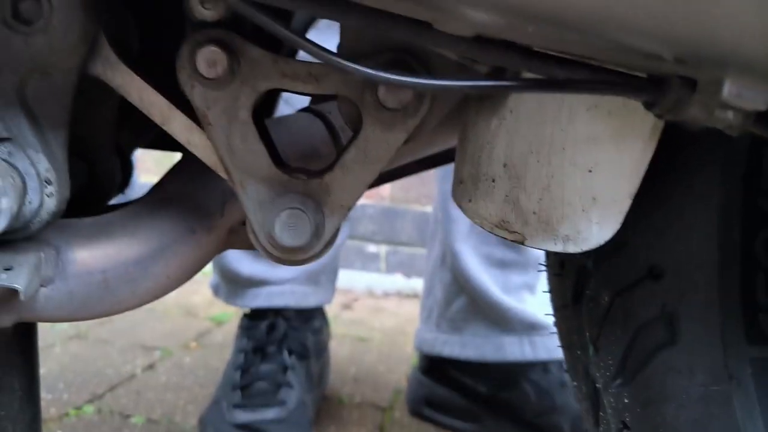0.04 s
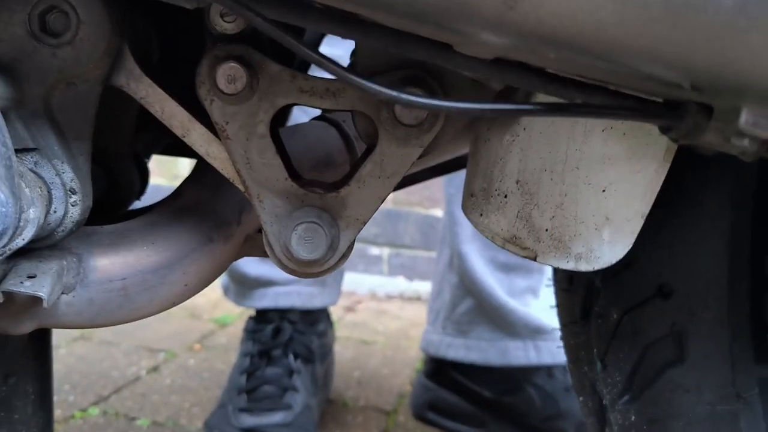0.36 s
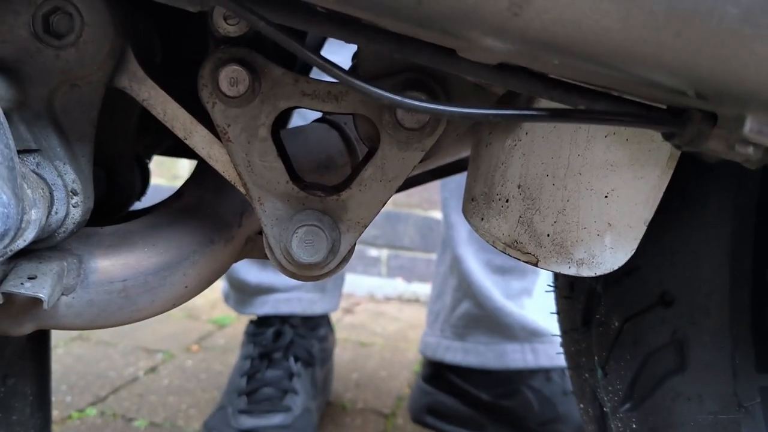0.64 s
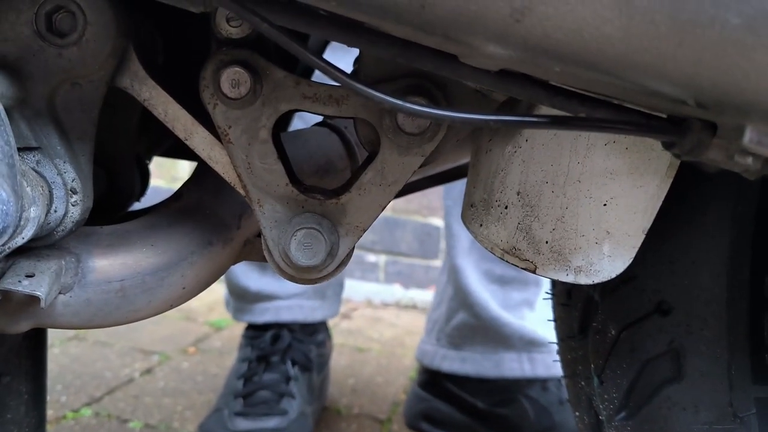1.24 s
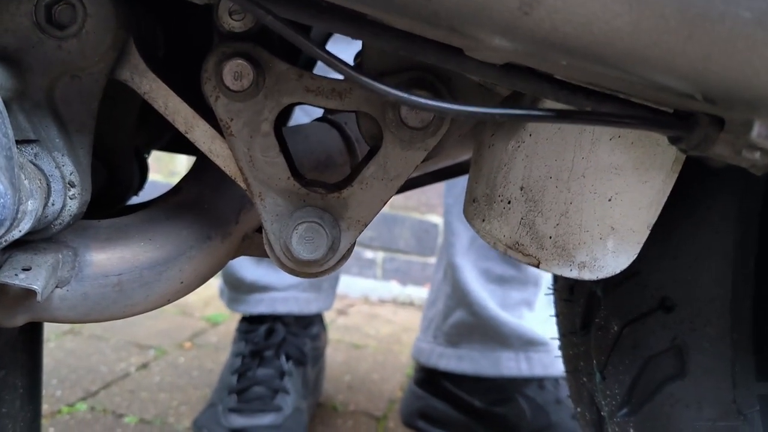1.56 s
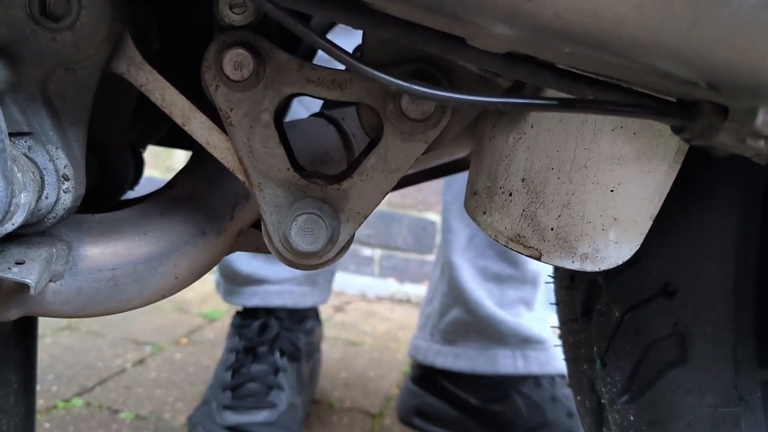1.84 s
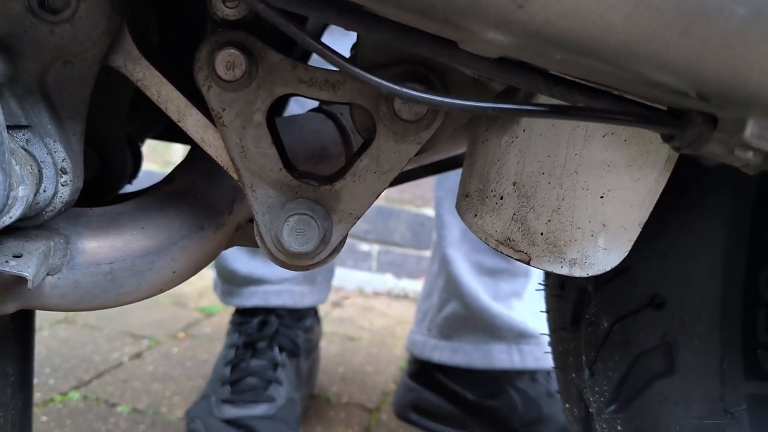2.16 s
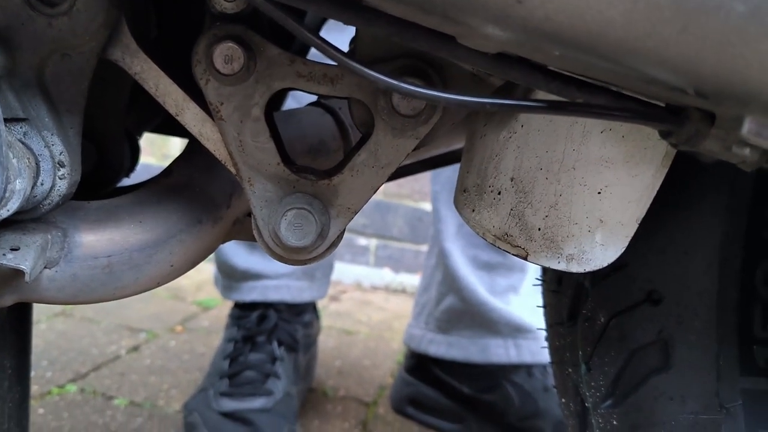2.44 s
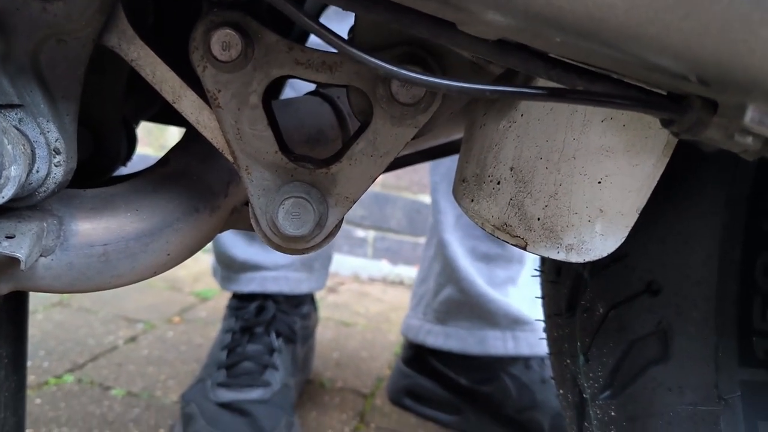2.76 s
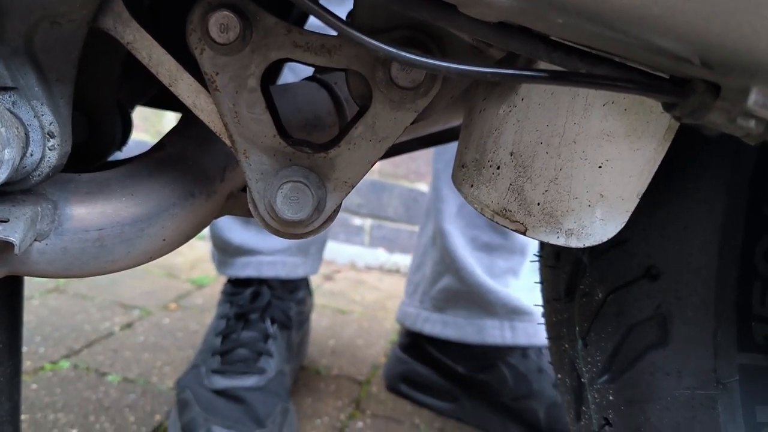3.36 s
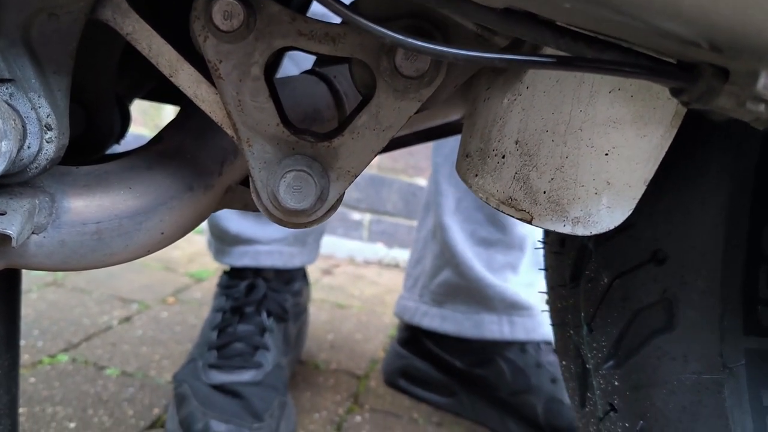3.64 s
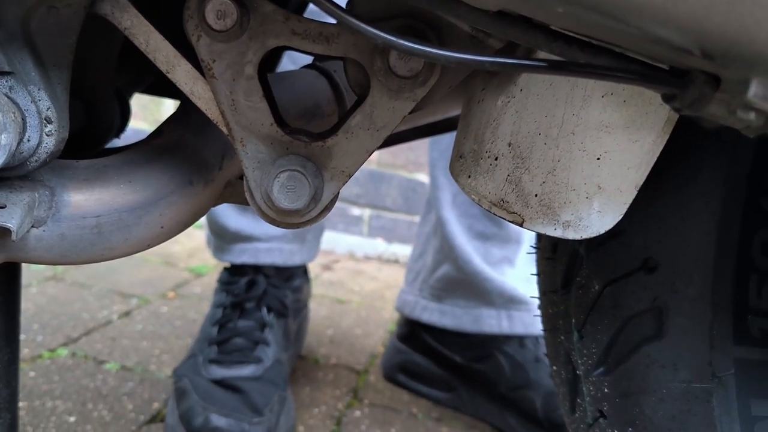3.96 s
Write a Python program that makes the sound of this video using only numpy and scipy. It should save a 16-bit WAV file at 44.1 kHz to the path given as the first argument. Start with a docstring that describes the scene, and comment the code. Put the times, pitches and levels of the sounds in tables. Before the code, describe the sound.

A motorcycle's rear suspension clunks three times up close, each with a rattle and low shudder.

```python
"""Three metallic clunks, each with a rattle and a low shudder, sound close to the rear suspension of a
parked motorcycle rocked by hand on paving. Slack in the linkage closes, and the impact excites the modes
of the steel; lighter contacts rattle round it while the frame trembles. Hollow taps and fine ticks fall
in between, and a far bird whistles over a low outdoor rumble and a soft hiss."""
import sys
import numpy as np
from scipy import signal
from scipy.fft import rfft, irfft
from scipy.io import wavfile
from scipy.ndimage import uniform_filter1d

SR = 44100
rng = np.random.default_rng(int(sys.argv[2]) if len(sys.argv) > 2 else 0)


def dump(signal):
    """Clip the signal to [-1, 1] and save it as 16-bit WAV at the path in sys.argv[1]."""
    limited = np.clip(np.atleast_2d(signal).T, -1, 1)
    pcm = np.round(limited * 32767).astype(np.int16)
    wavfile.write(sys.argv[1], SR, pcm)


N = 176400

# the slack closes: start_s, ring_gain_db, shudder_gain_db
CLUNKS = [(0.3932, 0, -5), (1.9888, -0.5, -4.5), (3.8524, -1, -5)]


def amp(db):
    """Amplitude ratio: a factor of ten for every 20 dB."""
    return 10 ** (np.asarray(db) / 20)


def along(table, hz, column=1):
    """Interpolation of one table column on a logarithmic frequency axis."""
    table = np.array(table, float)
    return np.interp(np.log(np.maximum(hz, 1)), np.log(table[:, 0]), table[:, column])


def add(out, start_s, sound):
    """Superposition: a sound adds to the mix from its start time."""
    i = max(int(start_s * SR), 0)
    out[:, i:i + sound.shape[1]] += sound[:, :max(N - i, 0)]


def noise(gain, size, bass_width=0.25, widening_hz=2220):
    """Filtered stereo noise of rms 1; coherence between the sides falls with frequency."""
    hz = np.fft.rfftfreq(size, 1 / SR)
    mid, side = rfft(rng.standard_normal((2, size)))
    width = np.clip(bass_width + hz / widening_hz, 0, 1)
    left_right = np.array([mid + width * side, mid - width * side])
    x = irfft(gain(hz) * left_right / np.hypot(1, width), size)
    return x / np.sqrt(np.mean(x ** 2))


def coloured(spectrum):
    """Stationary noise of rms 1 with a given spectral shape."""
    return noise(lambda hz: amp(along(spectrum, hz)), N)


def waver(rate_hz):
    """Random modulation: straight ramps between Gaussian values of spread 1."""
    step = max(int(SR / rate_hz), 1)
    return uniform_filter1d(np.repeat(rng.standard_normal(N // step + 1), step), step)[:N]


def swell(t, rise_s, t60_s):
    """Envelope of a damped resonance: build-up, then exponential decay; peak 1."""
    env = (1 - np.exp(-(t / rise_s) ** 2)) * np.exp(-np.log(1000) * t / t60_s)
    return env / env.max()


def burst(bands, rise_s):
    """Modal overlap: dense struck resonances merge into noise, each third octave with its own decay."""
    t, out = np.arange(SR // 2) / SR, 0
    for hz in 1000 * 2 ** (np.arange(-10, 13) / 3):
        if hz > bands[0][0] / np.sqrt(2):
            env = swell(t, rise_s + .5 / hz, along(bands, hz, column=2))
            band = env * noise(lambda f: np.exp(-(6 * (f / hz - 1)) ** 2), len(t))
            out = out + band * amp(along(bands, hz)) * np.sqrt(np.mean(env ** 2) / np.mean(band ** 2))
    return out


def background():
    """Random modulation makes a low outdoor rumble, two faint tones and a fading hiss waver."""
    # spectra of rumble and hiss: frequency_hz, relative_density_db
    rumble_spectrum = [(25, -33), (50, -17), (65, -11), (114, -5), (175, -8), (212, -3), (256, -8),
                       (344, -6.5), (416, -10), (520, -16.5), (610, -18.5), (700, -15.5), (1440, -23.5),
                       (2220, -24), (3820, -37.5), (6000, -41.5), (8360, -37), (9070, -40.5), (16000, -39)]
    hiss_spectrum = [(2000, 2), (3100, -6), (3900, -3.5), (4600, -7.5), (6200, -1.5), (8000, -0.5),
                     (10000, -11.5), (16000, -11.5)]
    # low tones: pitch_hz, level_db
    tones = [(123.8, -61), (209.9, -60)]
    # contour of the hiss: time_s, level_db
    hiss_contour = [(0, -55.5), (.18, -57.5), (.3, -64.5), (.6, -59), (.85, -57), (1.15, -72), (1.75, -66),
                    (2.4, -72.5), (4, -69)]
    out = amp(-52.5 + .6 * waver(5.84)) * coloured(rumble_spectrum)
    for hz, db in tones:
        env = amp(db + 3.5 * waver(5.15))
        pitch_hz = hz * (1 + .03 * waver(25))
        out += env * np.sin(2 * np.pi * np.cumsum(pitch_hz) / SR)
    hiss_db = np.interp(np.arange(N) / SR, *np.array(hiss_contour).T) + 1.3 * waver(50)
    return out + amp(hiss_db) * coloured(hiss_spectrum)


def tick(hz, relative_bandwidth=0.21):
    """A tiny click: quickly decaying noise shaped by one broad resonance."""
    t = np.arange(SR // 10) / SR
    grain = noise(lambda f: 1 / np.hypot(1, ((f + 1) / hz - hz / (f + 1)) / relative_bandwidth), len(t))
    return amp(-52.5) * swell(t, rise_s=0.00034, t60_s=0.024) * grain


def ticks():
    """Short transients, heard as fine bright ticks while the bike is moved."""
    # fine ticks: start_s, resonance_hz, gain_db
    clicks = [(0.038, 6150, 8), (.158, 9000, -1), (.301, 9000, -0.5), (1.389, 8600, -2), (1.437, 4100, -7),
              (1.488, 8800, -2), (1.659, 8400, 4), (1.8923, 8700, -2), (1.9465, 6100, -0.5),
              (2.382, 7000, -2.5), (2.51, 7000, 0.5), (2.7763, 6030, -4), (3.175, 9400, 0),
              (3.25, 9800, -2.5), (3.377, 6900, 1)]
    out = np.zeros((2, N))
    for start_s, hz, db in clicks:
        add(out, start_s, amp(db) * tick(hz))
    return out


def grit(count=36):
    """A random point process: faint ticks scattered evenly in probability over time."""
    out = np.zeros((2, N))
    for when, colour, faintness in rng.random((count, 3)):
        gain_db = -11 - 2.2 * np.log(faintness + 0.041)
        add(out, when * N / SR, amp(gain_db) * tick(5500 + 4500 * colour))
    return out


def taps():
    """As the bike leans, one strongly damped mode gives each dull tap its hollow pitch."""
    # dull taps: start_s, pitch_hz, gain_db
    contacts = [(.084, 724, -1.5), (.733, 640, -5), (1.599, 1290, -4.5), (1.660, 726, 1),
                (1.783, 720, -3.5), (1.811, 678, 3), (3.466, 703, -1), (3.631, 735, -3.5)]
    # dense resonances of a tap: frequency_hz, third_octave_peak_db, t60_s
    tap_bands = [(500, -56, 0.16), (864, -62.5, 0.15), (1370, -62.5, 0.15), (2000, -57.5, 0.028),
                 (3280, -65.5, 0.013), (5000, -78, 0.043), (9000, -78, 0.034)]
    out, t = np.zeros((2, N)), np.arange(SR // 2) / SR
    env = amp(-43.5) * swell(t, rise_s=0.0013, t60_s=0.036)
    for start_s, hz, db in contacts:
        hollow = env * np.sin(2 * np.pi * hz * t)
        add(out, start_s, amp(db) * (hollow + burst(tap_bands, rise_s=0.00075)))
    return out


def bird(echo_db=-3):
    """Reverberation: reflections from walls blur the falling whistles of a far bird."""
    # whistles: start_s, length_s, start_hz, end_hz, level_db
    whistles = [(.32, .06, 2970, 2930, -65), (.605, .075, 2140, 2080, -61), (.72, .4, 2880, 2100, -66.5),
                (1.21, .33, 3000, 2170, -69.5), (1.61, .19, 2980, 2350, -70)]
    out, t = np.zeros((2, N)), np.arange(SR // 2) / SR
    for start_s, length_s, start_hz, end_hz, db in whistles:
        size = int(length_s * SR)
        progress = np.linspace(0, 1, size)
        glide_hz = start_hz + (end_hz - start_hz) * np.sin(np.pi * progress / 2) ** 2
        pitch_hz = glide_hz * (1 + .028 * waver(130)[:size])
        fade = np.clip(np.minimum(progress, 1 - progress) / .1, 0, 1)
        env = fade * amp(db + 3 * waver(45)[:size])
        add(out, start_s, np.tile(env * np.sin(2 * np.pi * np.cumsum(pitch_hz) / SR), (2, 1)))
    walls = rng.standard_normal((2, len(t))) * swell(t, rise_s=.005, t60_s=.3)
    echo = signal.fftconvolve(out, walls / np.linalg.norm(walls[0]), axes=1)[:, :N]
    return out + amp(echo_db) * echo


def linkage_ring(out_of_step_hz=3040):
    """Impulse response of the steel: a crack, a faint after-ring and modes, the low ones blooming late."""
    # dense resonances: frequency_hz, third_octave_peak_db, t60_s
    crack = [(101, -46, 0.18), (250, -28.5, 0.025), (500, -28, 0.11), (915, -24, 0.048), (1420, -23, 0.015),
             (2010, -26, 0.077), (2700, -28.5, 0.11), (3400, -29, 0.051), (4400, -41, 0.091),
             (7360, -34.5, 0.047), (10400, -42, 0.082), (16000, -51, .035)]
    after_ring = [(197, -50, 0.31), (560, -43, 0.5), (1610, -39, 0.13), (3050, -62, 0.84),
                  (7300, -57.5, 0.7), (16000, -67, .45)]
    # modes of linkage and swingarm: pitch_hz, level_db, rise_s, t60_s, left_minus_right_db
    modes = [(115, -34.5, 0.0053, 0.23, 5), (421.5, -19.5, 0.02, 0.055, 1.5),
             (625.5, -19.5, 0.0065, 0.06, 5), (693, -25, 0.0025, 0.038, 19),
             (1110, -26.5, 0.0028, 0.042, -3), (1236, -18, 0.0013, 0.02, 10),
             (1431, -15.5, 0.0015, 0.062, -1.5), (1530, -22.5, 0.0035, .055, 9),
             (1683, -19.5, 0.00054, 0.03, -20.5), (1927, -30, 0.00033, 0.057, 15.5),
             (2140, -28.5, 0.0013, 0.08, -9), (2318, -36, 0.00041, 0.13, -8),
             (2581, -16.5, 0.0015, 0.029, 3), (2834, -31.5, 0.00069, 0.092, -8),
             (5018, -39, 0.0034, 0.022, -11), (5730, -43, .002, .07, -8), (8550, -55, 0.0012, 0.26, 11)]
    t, sides = np.arange(SR // 2) / SR, np.array([[.5], [-.5]])
    out = burst(crack, rise_s=0.00027) + burst(after_ring, rise_s=0.011)
    angles = rng.uniform(-np.pi, np.pi, (len(modes), 2))
    for (hz, db, rise_s, t60_s, pan_db), (phase, lag) in zip(modes, angles):
        port_phase = sides * lag * min(hz / out_of_step_hz, 1)  # high modes reach the ports out of step
        wave = np.sin(2 * np.pi * hz * t + phase + port_phase)
        out = out + amp(db + sides * pan_db) * swell(t, rise_s, t60_s) * wave
    return out


def rattles(ring, soft_contact_hz=2400):
    """Longer contact acts as a low-pass: light blows round each clunk ring duller, and also scrape."""
    # lighter contacts: start_s, ring_gain_db, scrape_gain_db
    contacts = [(.374, -30.5, -32), (.438, -48, -8), (0.4528, -11, -6.5), (.456, -35, -6),
                (0.486, -24, -12), (0.507, -41, -11.5), (0.581, -27, -16), (1.971, -33.5, -28),
                (2.0455, -14, -11), (2.055, -31, -4.5), (2.085, -28, -16), (2.172, -28.5, -18),
                (2.184, -40, -10.5), (3.833, -30, -22), (3.861, -20, -3), (3.9025, -13.5, -14),
                (3.946, -28, -14)]
    # dense resonances of a scrape: frequency_hz, third_octave_peak_db, t60_s
    scrape = [(1500, -43, 0.033), (3500, -44, 0.037), (5500, -43, 0.06), (8000, -35.5, 0.066),
              (11100, -41, .035), (16000, -47, .03)]
    out = np.zeros((2, N))
    dull_ring = signal.lfilter(*signal.butter(1, soft_contact_hz, fs=SR), ring)
    for start_s, ring_db, scrape_db in contacts:
        add(out, start_s, amp(ring_db) * dull_ring + amp(scrape_db) * burst(scrape, rise_s=0.00035))
    return out


def clunks(ring):
    """Impact excitation: the slack closes with a hard blow that rings the steel."""
    out = np.zeros((2, N))
    for start_s, db, _ in CLUNKS:
        add(out, start_s, amp(db) * ring)
    return out


def shudder(rise_s=0.037, fall_after_s=0.13, fall_db_per_s=134):
    """Damped vibration: after each clunk the whole bike trembles for a moment and settles."""
    # low resonances of frame, tyre and bodywork: frequency_hz, relative_density_db
    body_spectrum = [(45, -45), (80, -5), (120, -2), (150, -6.5), (205, 4.5), (255, -2), (320, 1),
                     (355, 1.5), (410, 2.5), (460, -8), (510, -1), (560, -13), (640, -6.5), (760, -16),
                     (900, -17), (2000, -23.5), (5000, -50)]
    env = np.zeros(N)
    for start_s, _, db in CLUNKS:
        age_s = np.arange(N) / SR - start_s
        fall_db = fall_db_per_s * np.maximum(age_s - fall_after_s, 0)
        env += np.clip(age_s / rise_s, 0, 1) * amp(db - fall_db)
    return amp(-28.5) * env * coloured(body_spectrum)


def scene():
    """Superposition of all sources at the microphone."""
    ring = linkage_ring()
    motorcycle = clunks(ring) + rattles(ring) + shudder() + taps() + ticks() + grit()
    return motorcycle + bird() + background()


def record(dry, ceiling=0.6, low_cut_hz=56, top_hz=16000):
    """Minimum-phase filters colour each microphone port; saturation rounds peaks; the band is limited."""
    # response of the two ports: frequency_hz, left_db, right_db
    response = [(2980, -2, 0), (4200, 1, 1.5), (4970, 0.5, 6), (8000, -2.5, 3), (8300, 4, 2.5),
                (8100, 12.5, -16.5), (9000, -1, -13), (10900, 0, -1), (16000, -1.5, -1)]
    hz = np.fft.rfftfreq(2 * N, 1 / SR)
    cepstrum = irfft(np.log(amp([along(response, hz, column=1), along(response, hz, column=2)])))
    causal_window = np.r_[1, np.full(N - 1, 2), 1, np.zeros(N - 1)]  # ports ring only after a sound
    ports = np.exp(rfft(cepstrum * causal_window))
    x = irfft(rfft(dry, 2 * N) * ports)[:, :N]
    x = ceiling * np.tanh(x / ceiling)
    x = signal.sosfilt(signal.butter(6, low_cut_hz, "high", fs=SR, output="sos"), x)
    return signal.sosfilt(signal.ellip(10, .2, 70, top_hz, fs=SR, output="sos"), x)


dry = scene()
out = record(dry)
dump(out)
```